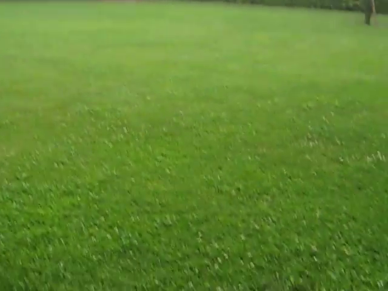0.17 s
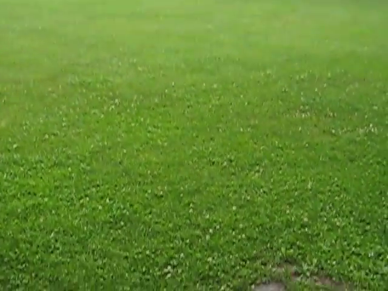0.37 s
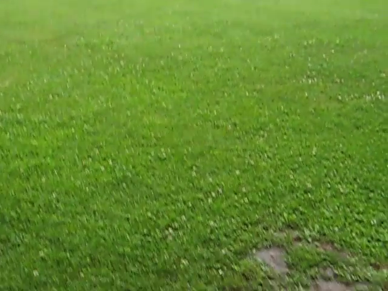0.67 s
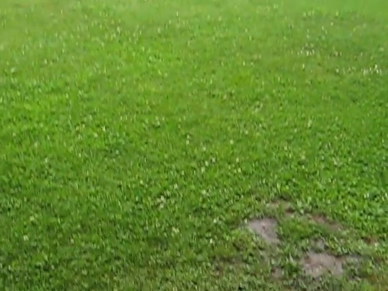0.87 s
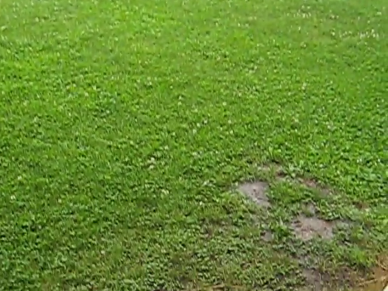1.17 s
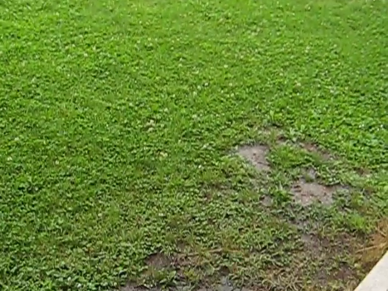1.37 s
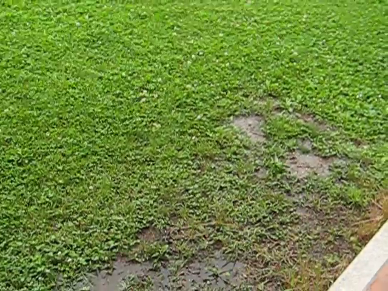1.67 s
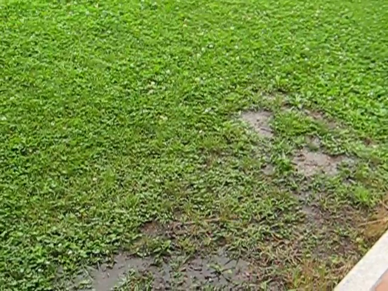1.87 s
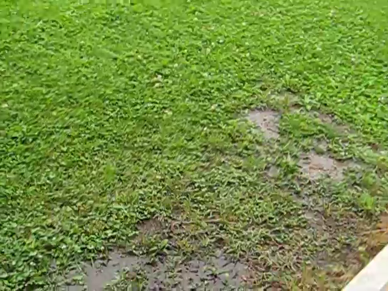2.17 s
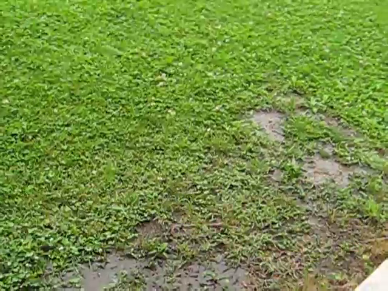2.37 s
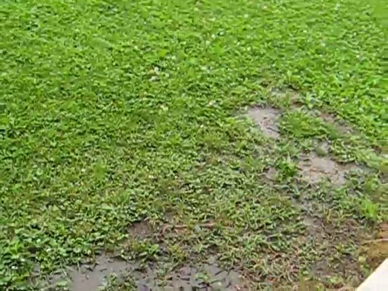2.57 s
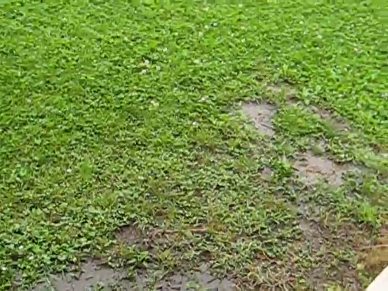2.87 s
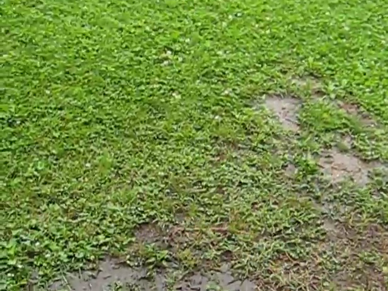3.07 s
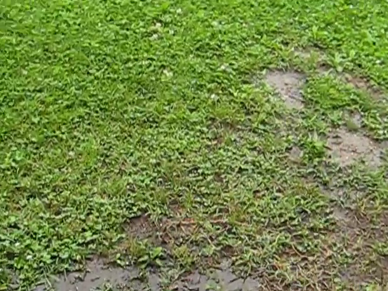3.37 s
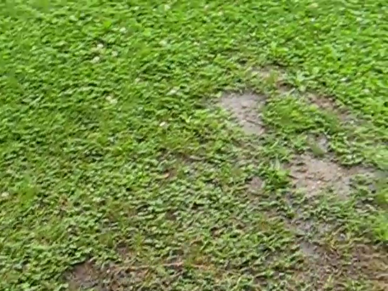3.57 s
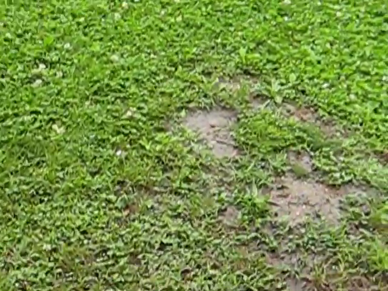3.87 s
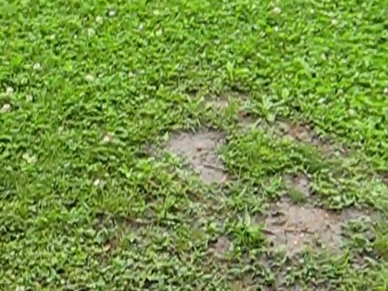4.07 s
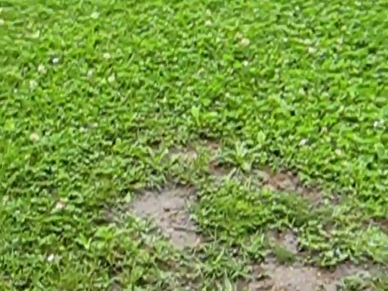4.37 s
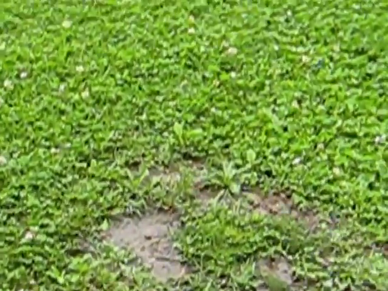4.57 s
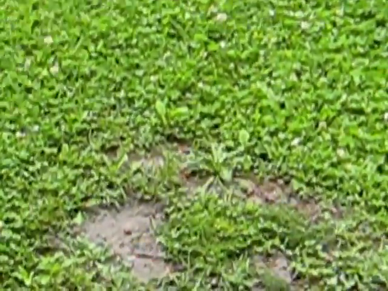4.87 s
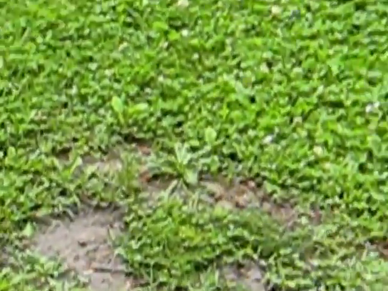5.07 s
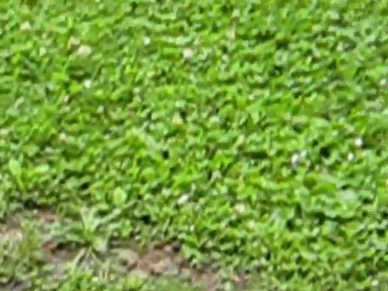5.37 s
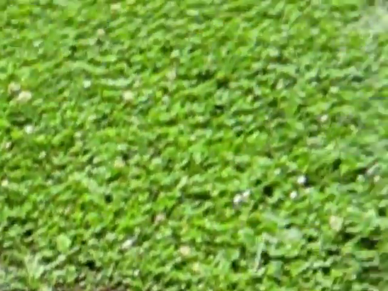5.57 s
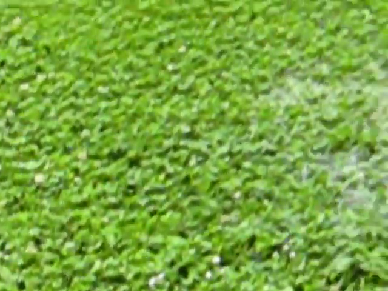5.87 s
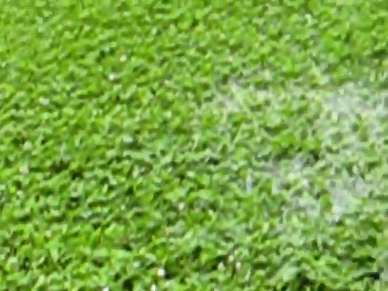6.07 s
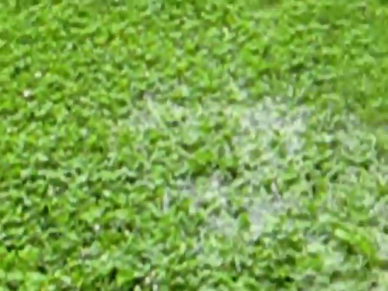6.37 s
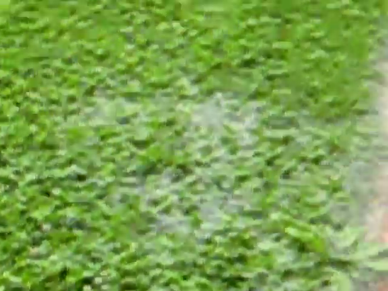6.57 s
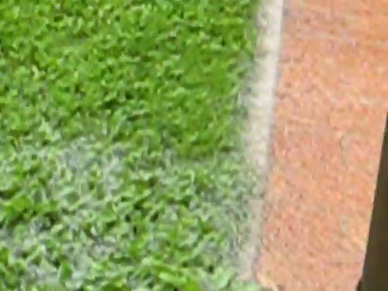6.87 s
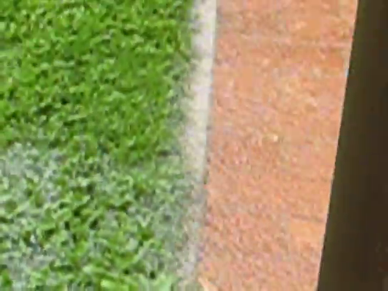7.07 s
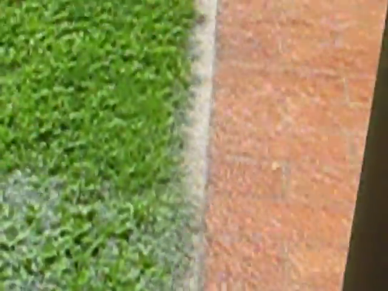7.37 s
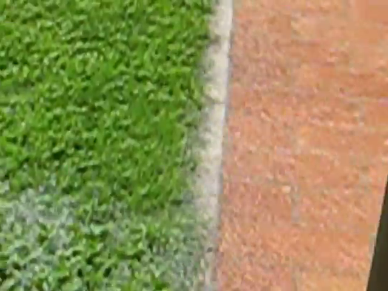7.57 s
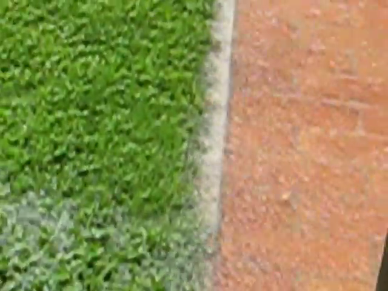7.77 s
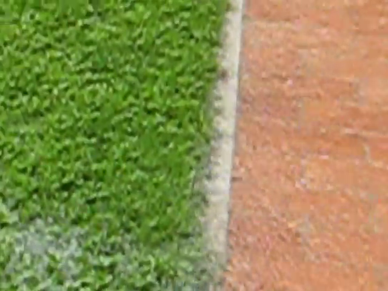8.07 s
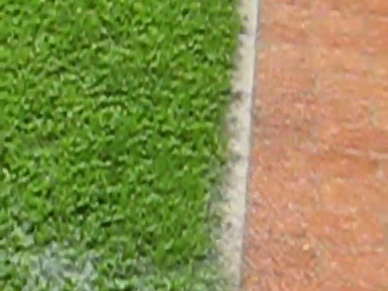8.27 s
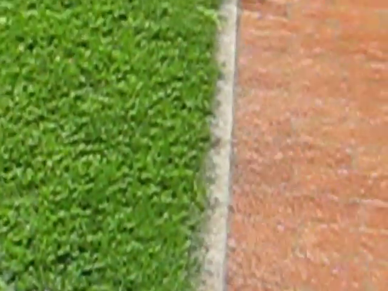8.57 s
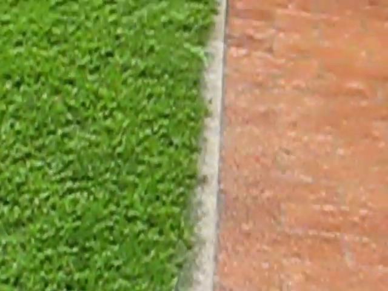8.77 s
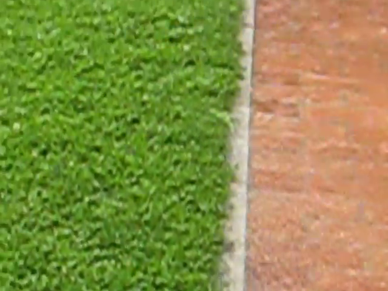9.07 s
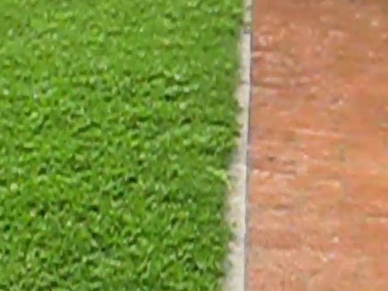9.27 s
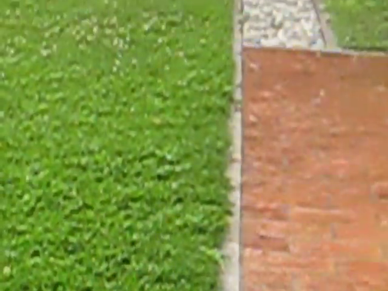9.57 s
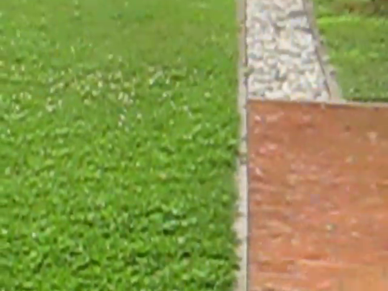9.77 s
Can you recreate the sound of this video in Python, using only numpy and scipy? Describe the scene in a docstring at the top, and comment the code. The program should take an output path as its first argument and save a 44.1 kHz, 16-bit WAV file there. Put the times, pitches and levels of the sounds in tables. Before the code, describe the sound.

A small bird chirps in threes through a steady downpour that patters on grass and spatters on wet paving.

```python
"""Heavy rain on a lawn, heard in mono from the edge of a paved terrace.
Far drops merge into a wash, nearer ones patter on leaves, spray ticks on wet paving, fat drips land close.
Bubbles ring in puddles; running water rings faint hollow tones in the gutters.
A small bird in the hedge chirps in runs of three, with a garden echo. The sound cuts out once, briefly."""
import sys
import numpy as np
from scipy import signal
from scipy.fft import rfft, irfft, next_fast_len
from scipy.io import wavfile
from scipy.ndimage import uniform_filter1d

SR = 44100
rng = np.random.default_rng(int(sys.argv[2]) if len(sys.argv) > 2 else 0)


def wrap_up_sound(samples):
    """Save the sound to the file named by the first command line argument, as 16-bit audio."""
    columns = np.atleast_2d(samples).T
    # keep every value between -1 and 1, then stretch to whole-number steps
    tamed = np.clip(columns, -1, 1)
    steps = np.round(tamed * 32767).astype(np.int16)
    wavfile.write(sys.argv[1], SR, steps)


N = 437913
TIME = np.arange(N) / SR


def undb(db):
    """Decibels to gain."""
    return 10 ** (np.asarray(db) / 20)


def unit(x):
    """Scale to rms 1."""
    return x / np.sqrt(np.mean(x ** 2))


def add(track, start_s, sound):
    """Mix a sound in at start_s."""
    i = max(int(start_s * SR), 0)
    track[i:i + len(sound)] += sound[:N - i]


def colour(x, points):
    """Filter by a curve of (Hz, dB) points; rms 1."""
    hz, db = np.transpose(points)
    size = next_fast_len(N + 4096, True)
    bin_hz = np.maximum(np.arange(size // 2 + 1) * SR / size, 1)
    gain = undb(np.interp(np.log(bin_hz), np.log(hz), db))
    return unit(irfft(rfft(x, size) * gain, size)[:N])


def band(x, low_hz, high_hz):
    """Band-pass; the narrower, the longer it rings."""
    sos = signal.butter(2, [low_hz, min(high_hz, .48 * SR)], "band", fs=SR, output="sos")
    return signal.sosfilt(sos, x + 1e-18)


def walk(rate_hz, size=N):
    """Smooth random drift; rms 1."""
    hold = max(int(SR / rate_hz), 1)
    steps = np.repeat(rng.standard_normal(size // hold + 1), hold)
    return unit(uniform_filter1d(steps, hold)[:size])


def gutters():
    """Running water rings narrow pipe resonances, which swell and fade."""
    # Each row: centre in s, spread in s, pitch in Hz, bandwidth in Hz, level in dB.
    resonances = [(3.2, 2.6, 331.6, 15, -58.5), (8.8, 0.82, 592, 23, -55.5)]
    out = np.zeros(N)
    for centre_s, spread_s, hz, width_hz, db in resonances:
        ring = unit(band(rng.standard_normal(N), hz - width_hz / 2, hz + width_hz / 2))
        swell = np.exp(-.5 * ((TIME - centre_s) / spread_s) ** 2)
        out += ring * undb(db) * swell
    return out


def puddles(count=90, low_hz=1600, high_hz=4200, decay_cycles=15, glide=0.132, base_db=-34, scatter_db=3):
    """Now and then a drop traps a bubble, which rings and rises in pitch."""
    out = np.zeros(N)
    t = np.arange(SR // 20) / SR
    for when, small, near in rng.random((count, 3)):
        start_hz = low_hz * (high_hz / low_hz) ** small
        decay = np.exp(-t * start_hz / decay_cycles)
        hz = start_hz * (1 + glide * (1 - decay))
        ring = np.sin(2 * np.pi * np.cumsum(hz) / SR) * decay
        add(out, when * N / SR, ring * undb(base_db - scatter_db * np.log(1.1 - near)))
    return out


def chirp(top_hz, second_db, third_db, scoop=.2, rise_share=.68, waver=0.0046, rough_db=2.5, rasp=0.0496):
    """Slides up and holds; harsh chirps start lower and rasp. The throat passes harmonics 2 and 3."""
    # Effort links three traits. Each row: level in dB, length in s, harshness 0-1.
    effort = [(-28, .082, .35), (-25.5, .088, .95)]
    levels_db, lengths_s, harshnesses = np.transpose(effort)
    length_s = np.interp(second_db, levels_db, lengths_s)
    harshness = np.interp(second_db, levels_db, harshnesses)
    progress = np.linspace(0, 1, int(length_s * SR))
    slow, fast, flutter = (walk(hz, size=SR // 4)[:len(progress)] for hz in (90, 900, 260))
    climb_left = np.maximum(1 - progress / rise_share, 0)
    sag = scoop * climb_left ** 1.6 + rasp * np.sqrt(climb_left) * fast
    phase = 2 * np.pi * np.cumsum(top_hz * (1 - harshness * sag + waver * slow)) / SR
    swell = np.abs(np.sin(np.pi * progress)) ** 0.18 * undb(rough_db * flutter)
    return swell * (undb(second_db) * np.sin(2 * phase) + undb(third_db) * np.sin(3 * phase))


def bird(pitch_scatter=0.00702):
    """Evenly spaced chirps on nearly one pitch; most runs fade as they go."""
    # Each row: start in s, chirp count, spacing in s, first chirp's harmonic 2 in dB,
    # its change per chirp in dB, top fundamental in Hz, harmonic 3 in dB.
    runs = [ (.002, 3, .30, -27.5, -5.5, 2400, -34), (1.538, 3, .33, -25.5, .1, 2435, -40),
            (3.292, 3, .316, -24.5, -3, 2444, -30.5), (4.855, 3, 0.31, -22.5, -2.5, 2446, -38),
            (6.922, 3, .283, -27.5, -1, 2426, -35), (8.52, 3, .274, -26.5, -0.5, 2420, -44),
            (9.715, 1, .3, -28.5, 0, 2385, -45)]
    out = np.zeros(N)
    for start_s, count, spacing_s, second_db, change_db, top_hz, third_db in runs:
        for k in range(round(count)):
            hz = top_hz * (1 + pitch_scatter * rng.standard_normal())
            add(out, start_s + k * spacing_s, chirp(hz, second_db + k * change_db, third_db))
    return out


def garden_echo(x, t60_s=0.73, echo_db=-0.2, delay_s=0.0043):
    """Hedge, trees and house wall scatter a sound into a tail; the whole keeps its level."""
    t = np.arange(SR) / SR
    tail = rng.standard_normal(len(t)) * np.exp(-np.log(1000) * t / t60_s) * (t > delay_s)
    echo = signal.fftconvolve(x, tail / np.linalg.norm(tail))[:N]
    return (x + undb(echo_db) * echo) / np.hypot(1, undb(echo_db))


def splash(peak_db, hz, droplets_db, attack_s=.00015, decay_1khz_s=.0015, tail_s=0.027):
    """A fat drop slaps down, low and broad or as a narrow tick; its droplets scatter just after."""
    t = np.arange(SR // 10) / SR
    slap = np.exp(-t * (hz / 1000) ** .48 / decay_1khz_s)  # higher dies sooner
    droplets = undb(droplets_db) * np.exp(-t / tail_s)
    force = (slap + droplets) * np.minimum(t / attack_s, 1)
    edge_ratio = np.interp(hz, [2000, 9000], [1.76, 1.18])
    sound = band(rng.choice([-1., 1.], len(t)) * force, hz / edge_ratio, hz * edge_ratio)
    return sound * undb(peak_db) / np.abs(sound).max()


def drips(turned, count=44, low_hz=3000, high_hz=11800, base_db=-14.5, terrace_db=3, scatter_db=4):
    """Fat close drips, plus smaller random ones: mostly high ticks, louder towards the terrace."""
    # Each row: start in s, peak in dB, splash centre in Hz, droplets in dB re the slap.
    fat_drips = [ (2.645, -14.5, 8800, 0), (3.2603, -2, 2100, -26), (3.2963, -9, 1700, -24),
                 (3.6336, -10, 4400, -24), (4.122, -9, 6300, -22), (4.677, -15.5, 1490, -10),
                 (5.436, -19, 1150, -16), (5.8734, -7.5, 4000, -11), (5.889, -13.5, 3500, -8),
                 (6.0454, -11, 11500, -32), (6.079, -14, 3800, -20), (7.080, -10, 11600, -32),
                 (7.9994, -8, 8800, -26), (8.0209, -6, 10200, -24), (8.588, -6, 8500, -26),
                 (9.105, -9, 10200, -28), (9.389, -10, 6800, -20)]
    out = np.zeros(N)
    for start_s, peak_db, hz, droplets_db in fat_drips:
        add(out, start_s, splash(peak_db, hz, droplets_db))
    for when, small, far in rng.random((count, 3)):
        peak_db = base_db + terrace_db * turned[int(when * N)] - scatter_db * far
        hz = low_hz + (high_hz - low_hz) * np.sqrt(small)
        add(out, when * N / SR, splash(peak_db, hz, droplets_db=-30))
    return out


def impacts(per_s, spread_db, cap_db):
    """Drops at random moments: many small and far, few large and near."""
    hits = rng.random(N) < per_s / SR
    size_db = np.minimum(spread_db * rng.exponential(size=N), cap_db)
    return hits * undb(size_db) * rng.choice([-1, 1], N)


def patter(per_band_per_s, spread_db, cap_db, flicker_db, bands=9):
    """Each size of leaf and drop answers in its own octave; together they are about white."""
    out = np.zeros(N)
    for hz in np.geomspace(350, 13000, bands):
        taps = band(impacts(per_band_per_s, spread_db, cap_db), hz / np.sqrt(2), hz * np.sqrt(2))
        out += unit(taps) * np.sqrt(hz) * undb(flicker_db * walk(rate_hz=25))
    return unit(out)


def paving(ticks_db=-13):
    """Drops burst on wet stone: sharp ticks in a fizz of tiny droplets."""
    # Each row: frequency in Hz, relative spectral density in dB.
    spray_spectrum = [(500, -40), (3000, -11), (6500, -1), (9000, 3.5), (11500, 1), (13500, -3.5),
                      (16000, -23)]
    ticks = unit(impacts(per_s=250, spread_db=4, cap_db=15))
    fizz = patter(per_band_per_s=1200, spread_db=0, cap_db=13, flicker_db=2.7)
    return colour(fizz + undb(ticks_db) * ticks, spray_spectrum)


def lawn(leaves_db=-5.5, drift_db=0.43):
    """Far rain on grass and trees merges into a wash; nearer drops patter on leaves."""
    # Each row: frequency in Hz, relative spectral density in dB.
    wash_spectrum = [(25, -22), (70, -14), (180, -11), (480, -8), (1050, -3), (1550, -4), (2150, -2),
                     (2850, -4.5), (4000, -1), (5300, -2), (7000, -6), (10500, -9), (13000, -16.5),
                     (16000, -26)]
    leaves = patter(per_band_per_s=700, spread_db=3.5, cap_db=15, flicker_db=2.0)
    rain = rng.standard_normal(N) + undb(leaves_db) * leaves
    return colour(rain, wash_spectrum) * undb(drift_db * walk(rate_hz=5))


def scene():
    """All sources, the same in both channels; the listener turns from lawn to terrace."""
    # Each row: time in s, share of the turn (0 lawn, 1 terrace).
    facing = [(1.8, 0), (2.7, 0.36), (4.6, 0.45), (6.4, 0.91), (9.93, 0.87)]
    # Each pair: rain level in dB facing the lawn, then facing the terrace.
    lawn_db = (-26.5, -27.9)
    paving_db = (-42, -32)
    turned = np.interp(TIME, *np.transpose(facing))
    wash = lawn() * undb(np.interp(turned, [0, 1], lawn_db))
    spray = paving() * undb(np.interp(turned, [0, 1], paving_db))
    mono = wash + spray + gutters() + puddles() + drips(turned) + garden_echo(bird())
    return np.array([mono, mono])


def record(dry, cutoff_hz=15850):
    """The sound cuts out once, briefly; a steep low-pass removes the top."""
    # Dropout: start in s, end in s, depth in dB.
    gap = (1.328, 1.3615, -30)
    start_s, end_s, depth_db = gap
    gain = undb(depth_db * ((TIME > start_s) & (TIME < end_s)))
    lowpass = signal.ellip(10, .1, 80, cutoff_hz, fs=SR, output="sos")
    return signal.sosfilt(lowpass, dry * gain)


dry = scene()
out = record(dry)
wrap_up_sound(out)
```